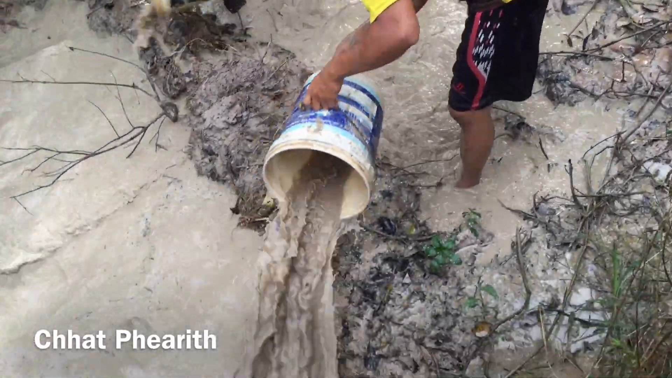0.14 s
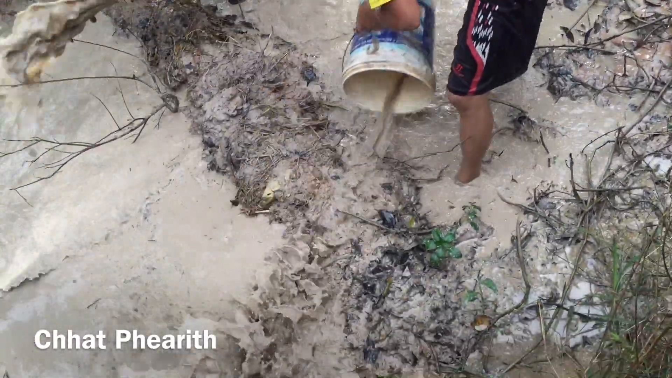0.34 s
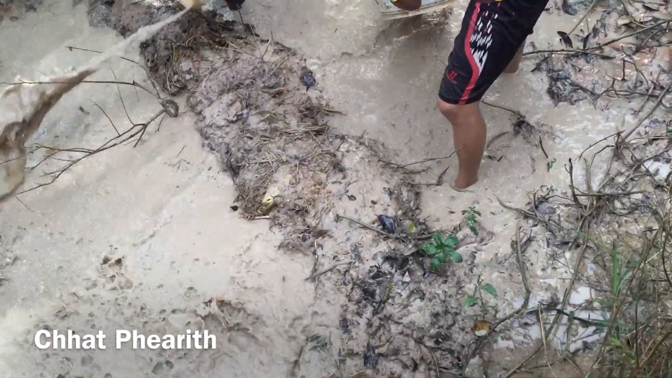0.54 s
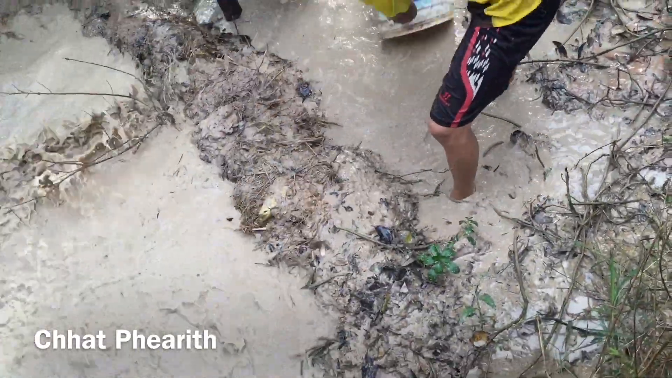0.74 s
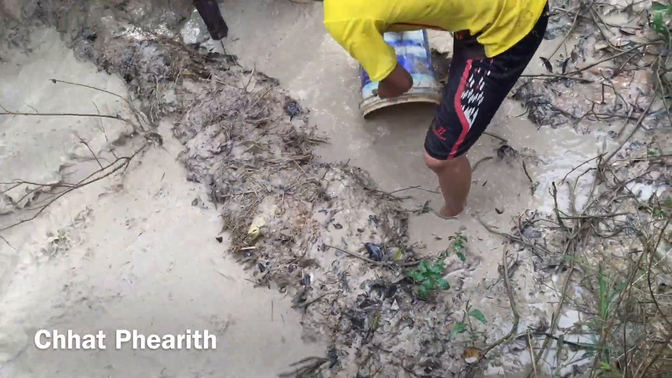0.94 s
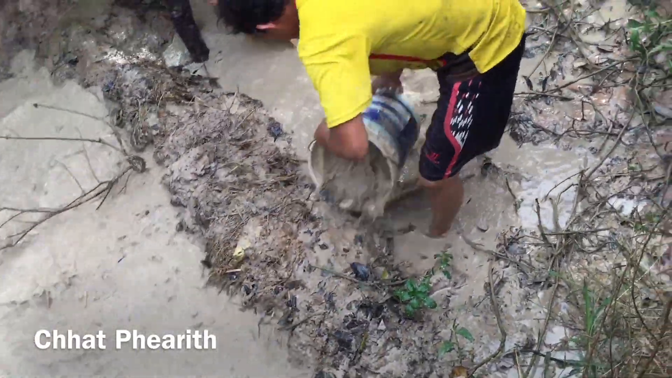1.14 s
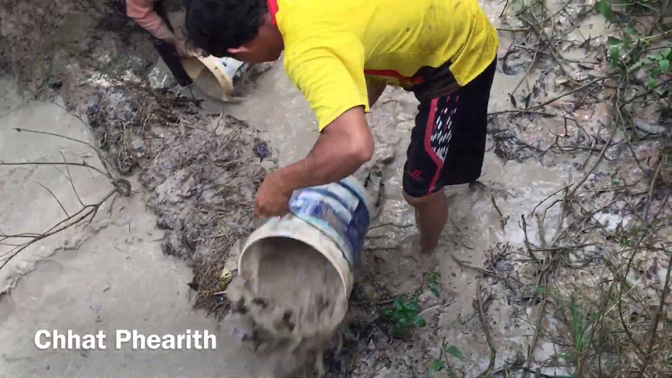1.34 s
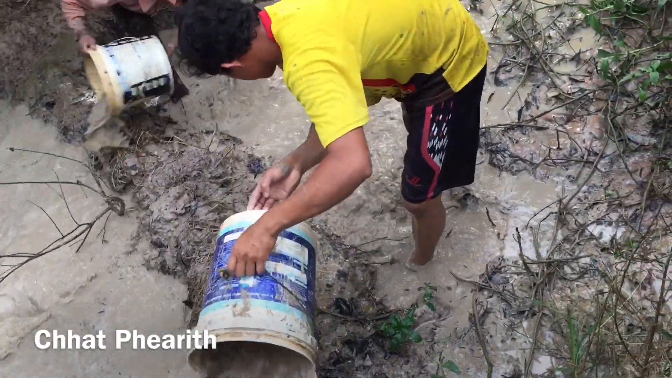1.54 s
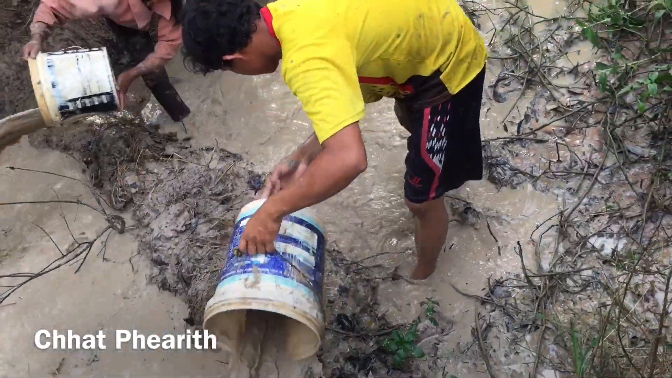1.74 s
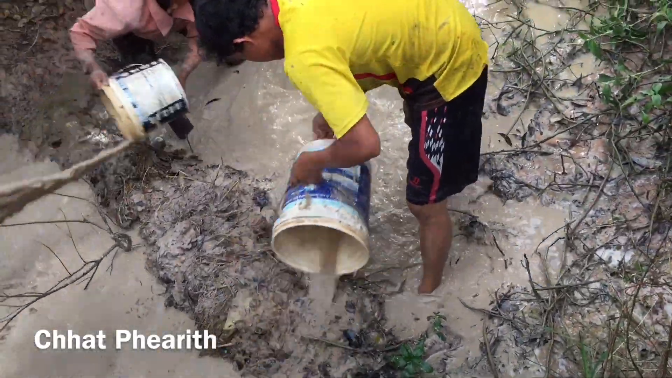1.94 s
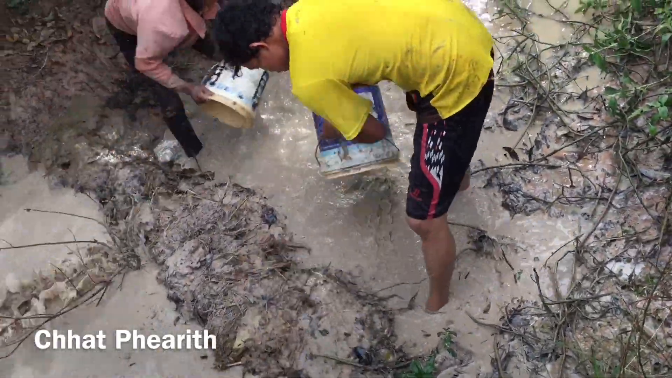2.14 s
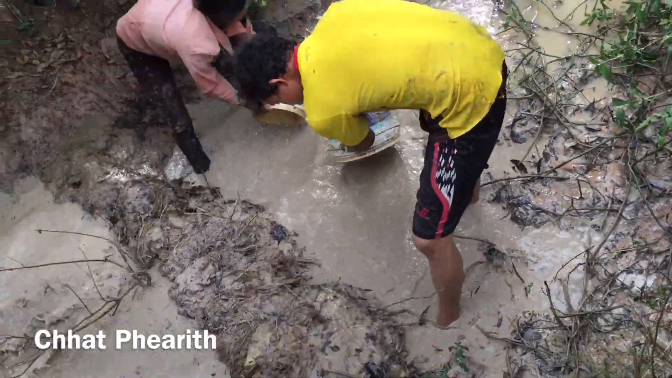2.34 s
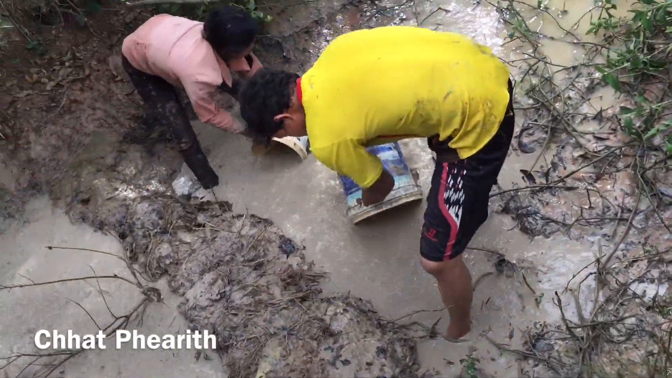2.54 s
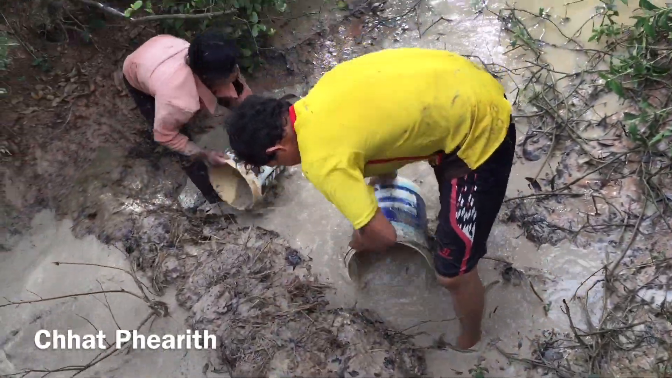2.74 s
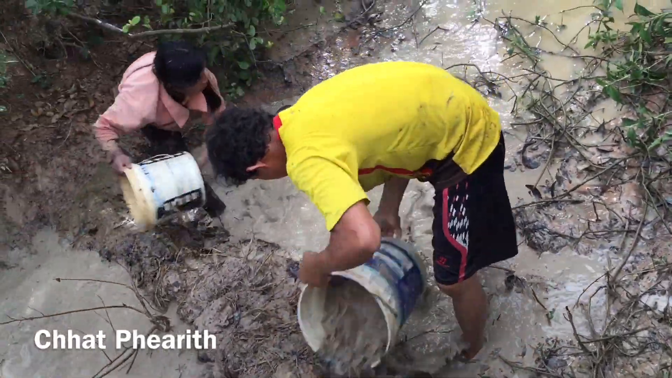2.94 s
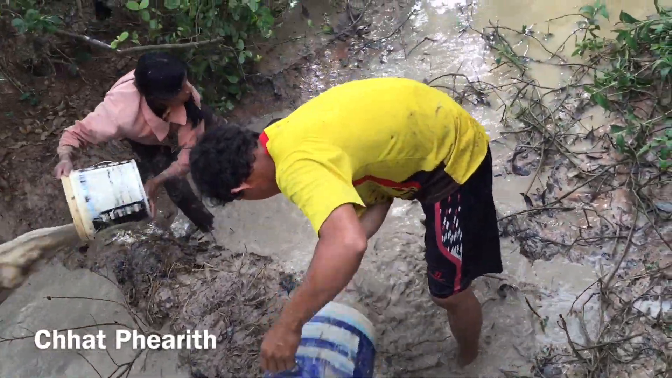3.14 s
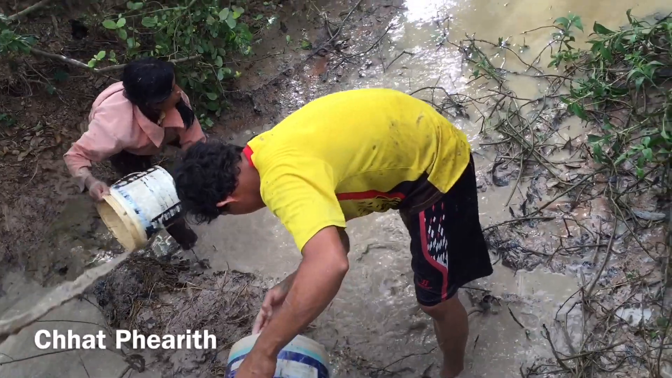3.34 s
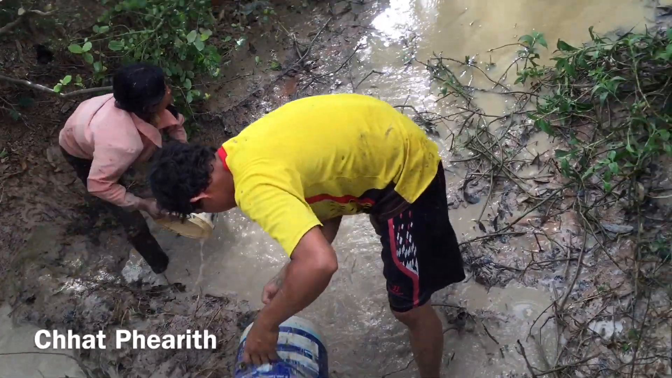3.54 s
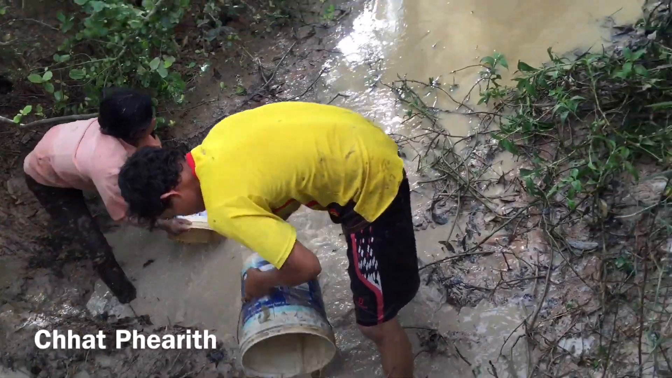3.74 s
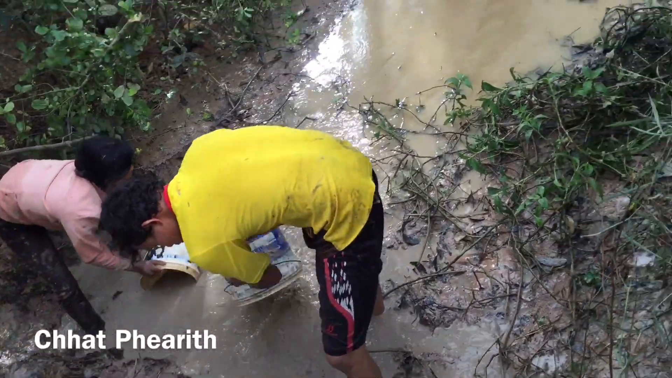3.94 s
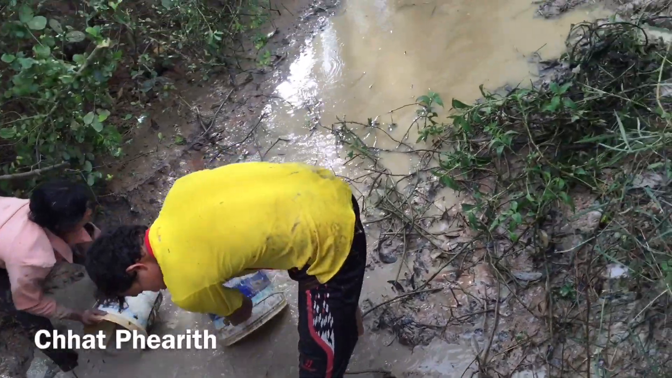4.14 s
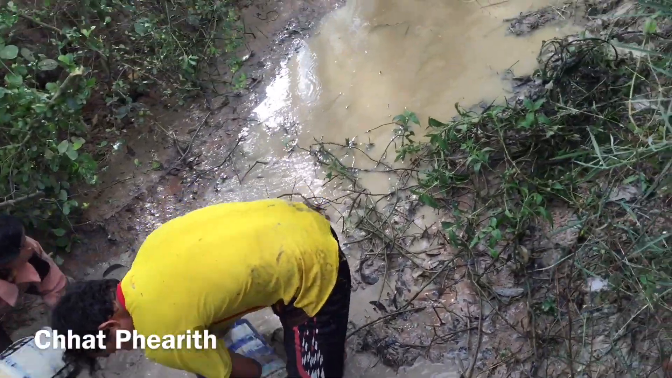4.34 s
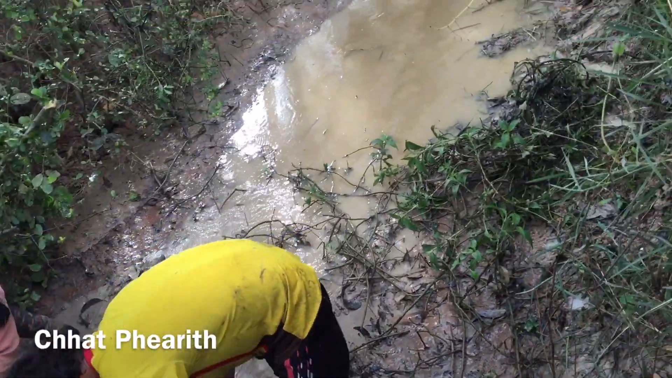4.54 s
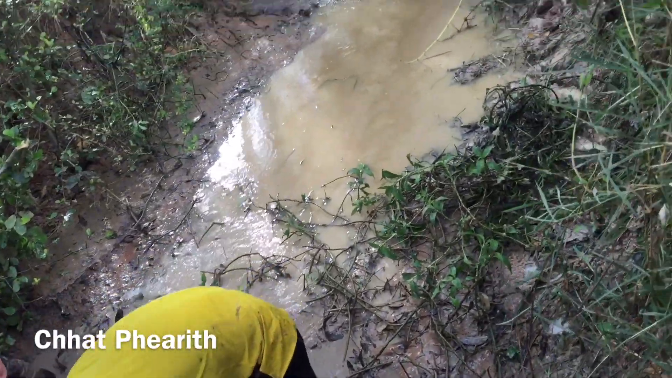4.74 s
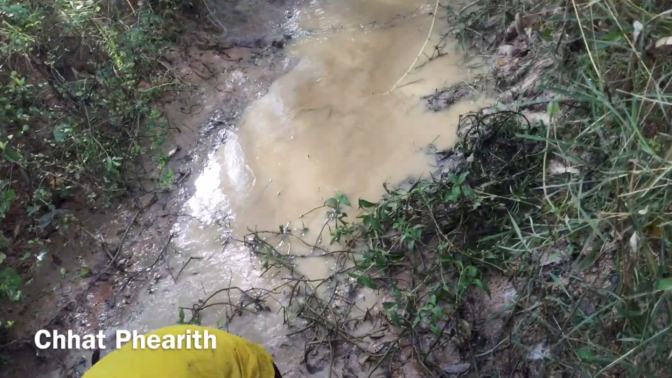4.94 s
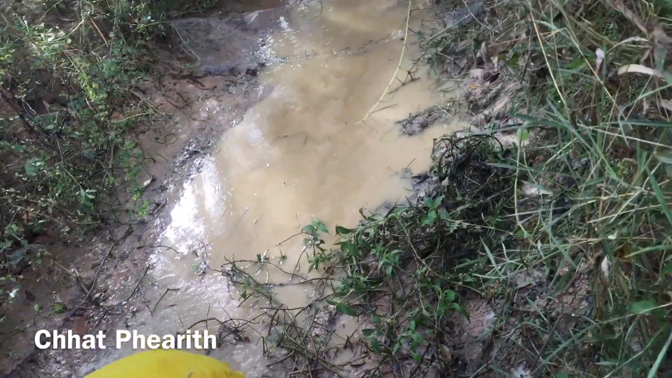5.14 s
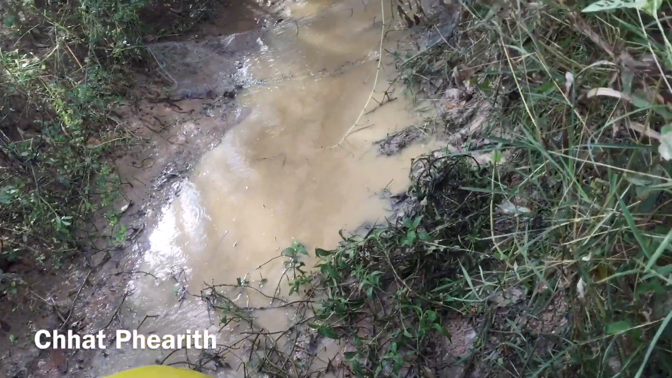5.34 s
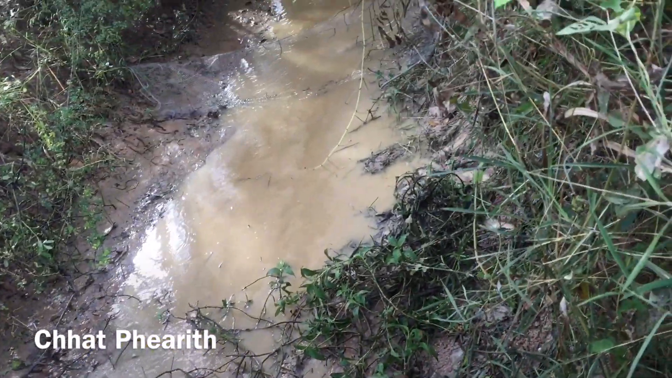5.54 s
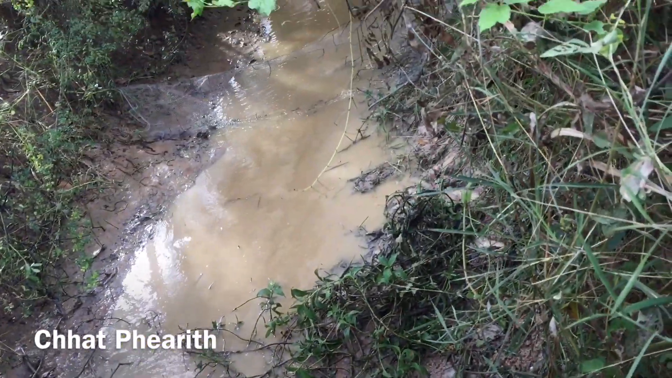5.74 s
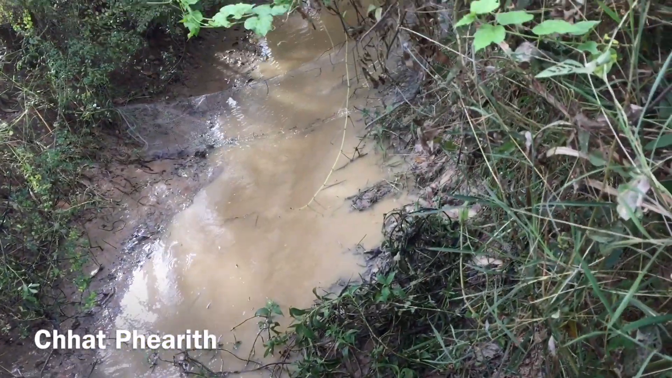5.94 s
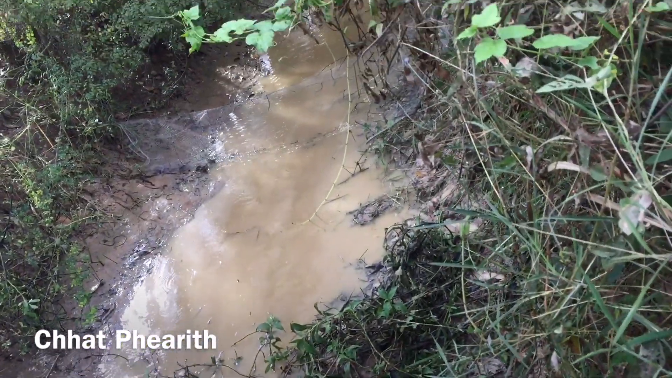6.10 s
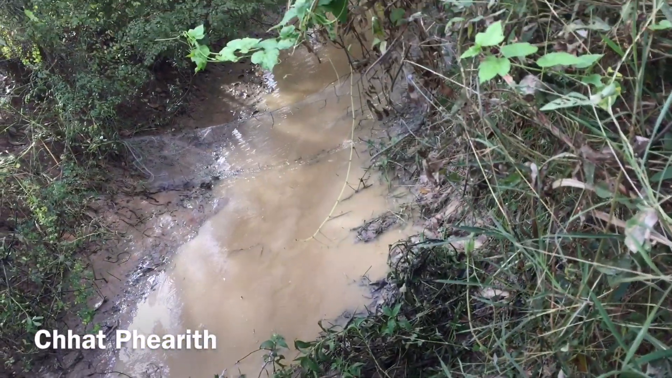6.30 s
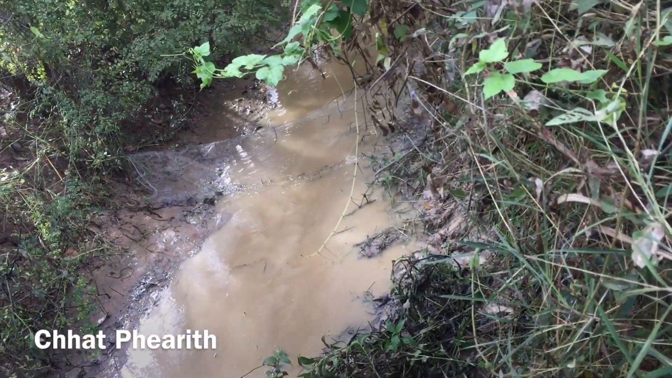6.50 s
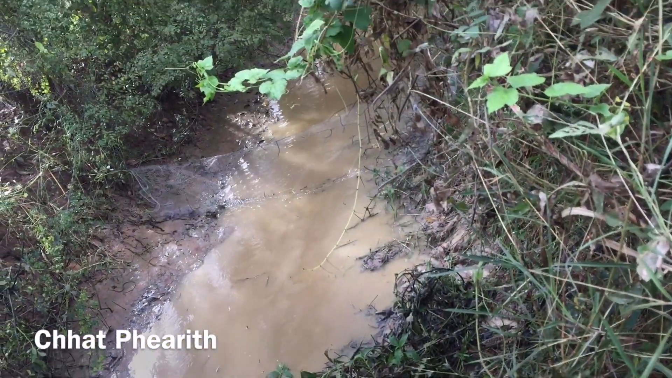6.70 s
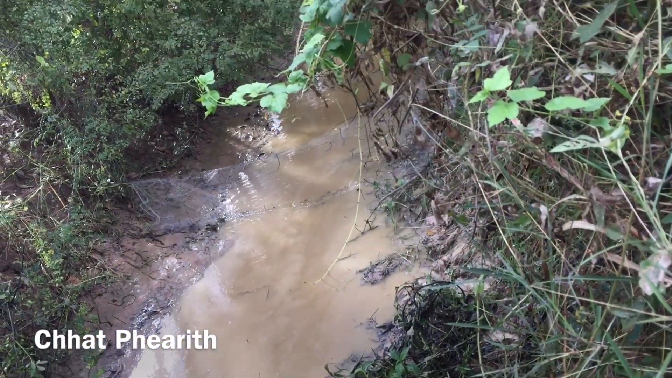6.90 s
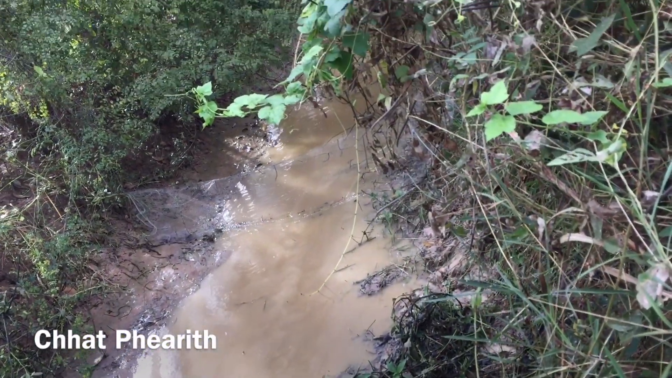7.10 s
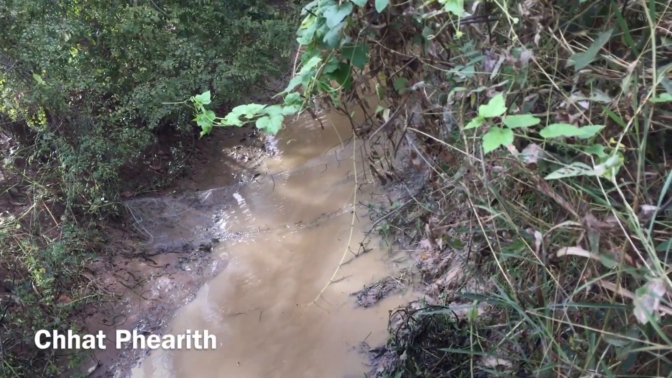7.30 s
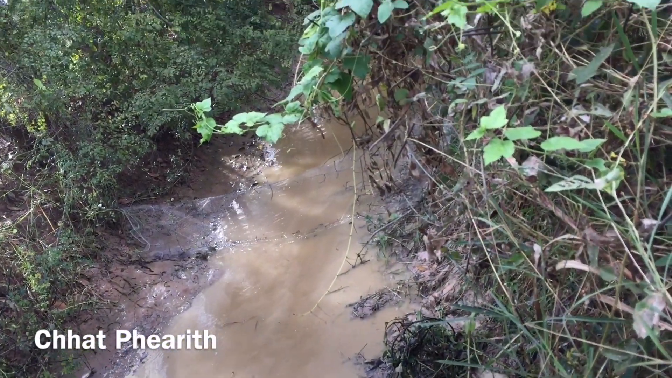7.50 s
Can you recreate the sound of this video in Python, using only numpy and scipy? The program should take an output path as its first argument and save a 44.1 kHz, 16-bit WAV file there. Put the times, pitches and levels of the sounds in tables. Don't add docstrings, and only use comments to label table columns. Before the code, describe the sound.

Close to a phone microphone in an open muddy ditch, bucket loads of water land four times, each a burst of spray, deep glugs, slaps and mud plops. Scooping and trickling fill the gaps. After the last load the pool settles to sparse drips, broken by one sharp wet slap, while a distant pump engine drones low.

```python
import sys
import numpy as np
from scipy import signal
from scipy.fft import rfft, irfft, next_fast_len
from scipy.io import wavfile
from scipy.ndimage import uniform_filter1d, map_coordinates

SR = 44100
rng = np.random.default_rng(int(sys.argv[2]) if len(sys.argv) > 2 else 0)


def invert_db(x):
    u = np.asarray(x, float) / 20
    return 10 ** u


def persist_wave(psi):
    counts = np.round(np.clip(psi, -1, 1) * 32767).astype(np.int16)
    wavfile.write(sys.argv[1], SR, np.atleast_2d(counts).T)


N = 337806

# start of full flow in seconds, rise in seconds,
# length in seconds, spray level in dB, depth (weight of the big bubbles) in dB.
POURS = [
    (0.105, 0.059, 0.3, -28.5, 4.5),
    (1.737, 0.044, 0.14, -27.5, 3.5),
    (3.455, 0.028, 0.35, -28, 4),
    (5.102, 0.052, 0.43, -31, 5),
]
# peak time in seconds, rise in seconds,
# spray level in dB, depth in dB, mist in dB.
SPLASHES = [(0.147, 0.042, -44.5, 27.5, 4.5), (0.719, 0.2, -28, -2.5, -0.5), (1.041, 0.015, -38, 7.5, -1.5),
            (1.558, 0.21, -46, -6, 3), (1.69, 0.078, -27, -16, -1), (1.789, 0.15, -27, 9.5, -7),
            (2.16, 0.099, -35.5, -6, 6.5), (2.69, 0.053, -42, -3, 4.5), (3.01, 0.33, -51.5, -18, 5.5),
            (3.424, 0.029, -39, 2, 8.5), (3.58, 0.17, -31, -4, 3.5), (4.212, 0.12, -44, 0, 0),
            (4.414, 0.038, -48.5, 5.5, 6.5), (4.93, 0.25, -57, 6.5, 1.5), (5.06, 0.058, -27.5, -22, 0),
            (5.17, 0.037, -40, 16, -3), (5.54, 0.66, -40.5, 1.5, 4), (5.116, 0.06, -32, 0, 4),
            (2.96, 0.19, -44.5, -17, -2), (2.529, 0.053, -50.5, -2.5, 6.5), (4.88, .03, -41.5, -14, -3),
            (6.088, 0.089, -59, -3, -2.5), (5.931, 0.024, -36.5, 0.5, -10), (6.421, 0.096, -51.5, -49, -2),
            (6.49, 0.028, -49, -43, 7), (6.552, 0.04, -33.5, -0.5, 1.5), (7.332, 0.059, -45.5, 5.5, -7.5)]
# start of full flow in seconds, length in seconds,
# spray level in dB, depth in dB, mist in dB.
TRICKLES = [(.01, 0.047, -63, -5, 10.5), (0.517, 0.16, -41, -25, 1.5), (0.81, 0.24, -43, 4, 0.5),
            (1.117, 0.2, -40.5, 0, -0.5), (1.385, 0.26, -42.5, 3, -4.5), (2.008, 0.21, -35, -1, 0),
            (2.315, 0.095, -36.5, -3, -3.5), (2.51, 0.22, -54, -11, 4), (2.71, 0.18, -42.5, 4, -3),
            (2.849, 0.24, -40.5, -5, -2), (3.137, 0.19, -50.5, 3.5, -2.5), (3.93, 0.19, -51, -1, 1.5),
            (4.25, 0.085, -49.5, 0.5, -1), (4.487, 0.1, -42, 6, -1.5), (4.627, 0.2, -49, -13, 2),
            (5.73, 0.15, -46, -7.5, -1), (6.017, 0.28, -51, -14, -9.5), (6.613, 0.097, -46.5, 5.5, -3.5),
            (6.76, 0.042, -42.5, -26, -5), (6.86, 0.09, -51, -40, -3.5), (5.983, 0.12, -59, -5, -5),
            (7.062, 0.23, -60, 4, -4.5), (7.37, 0.086, -54.5, -8, -3.5)]
# level in dB re spray, lag in seconds,
# share of the depth (ratio), share of the mist (ratio), speed of fading (ratio).
BUBBLE_SIZES = [(0.5, 0.0045, 0, 1, 0.94), (-7.5, -0.0071, 0, 1.5, 0.86), (-0.5, 0.014, 0.5243, 1.5, 1.29),
                (-6, 0.011, 1.21, 1, 2.06)]
# frequency in Hz, level in dB per Hz.
SPRAY_COLOUR = [(620, -14), (1050, -4), (2200, -1), (2450, -3), (3480, -2.5), (4320, -6), (4990, -11.5),
                (5500, -8.5), (7150, -12), (12100, -120)]
MIST_COLOUR = [(2350, -4), (4000, -2.5), (4870, -6), (5530, -4.5), (6810, -7.5), (9230, -9), (10300, -14),
               (11000, -120)]
GURGLE_COLOUR = [(240, -22), (400, -5.5), (579, -4.5), (716, 0.5), (1040, -6.5), (1300, -22), (1690, -36),
                 (2860, -120)]
CHURN_COLOUR = [(88, -18), (150, -7), (199, -6.5), (264, -4), (318, 1), (500, -1), (650, -36), (1100, -120)]
# time in seconds, peak level in dB, treble in dB re the peak.
SLAPS = [(0.0695, -19.5, 3.5), (0.1247, -15, 0), (0.28, -7.5, -13), (0.454, -13.5, -6), (0.612, -15.5, -2),
         (0.6825, -16, -3), (0.7163, -11, -5.5), (0.959, -14.5, -4.5), (1.04, -18, -5.5),
         (1.553, -23.5, -1), (1.639, -14, -4.5), (1.657, -26, 2.5), (1.681, -30, -5), (2.1517, -28, 1),
         (2.603, -22.5, -4), (3.314, -28.5, -6), (3.39, -30.5, 3), (3.408, -36.5, -2), (3.479, -13.5, -0.5),
         (3.57, -11.5, -10.5), (4.298, -24.5, -23), (4.422, -28, -5), (4.453, -34, 11.5), (4.5385, -19, -7),
         (4.9887, -37.5, 9.5), (5.046, -22.5, 1), (5.0658, -12, -4), (6.406, -43, 3.5), (6.527, -18.5, 0.5),
         (6.536, -7.5, -9.5)]
# time in seconds, peak level in dB.
LUMPS = [(0.325, -36), (1.007, -13.5), (5.846, -27.5), (1.4526, -30.5), (1.7514, -7.5), (1.8467, -10.5),
         (2.121, -9.5), (2.686, -24.5), (3.002, -18.5), (3.24, -28), (4.202, -34), (4.71, -41),
         (5.164, -10.5), (5.2995, -12.5), (6.545, -19), (1.215, -21.5), (1.284, -21), (1.33, -24),
         (5.9237, -35), (5.23, -16), (6.484, -17.5), (6.592, -12.5), (6.77, -26.5), (6.987, -25.5),
         (7.082, -35.5), (7.127, -36.5), (7.361, -37), (7.4, -34), (7.451, -37)]
# time in seconds, peak level in dB, pitch in Hz.
TICKS = [(0.0468, -26, 3330), (0.0727, -31, 3400), (0.1241, -13.5, 3730), (0.3242, -25.5, 2090),
         (0.9592, -29, 2300), (1.01, -22, 2450), (1.0415, -40, 2040), (1.3823, -29, 2210),
         (1.4163, -32, 2080), (1.455, -23.5, 3480), (1.5534, -33, 2320), (1.638, -24.5, 3600),
         (1.682, -26, 2320), (1.8467, -17, 2780), (2.1201, -17.5, 3020), (2.6045, -34, 2190),
         (2.6798, -17.5, 2700), (2.806, -41, 2220), (3.0046, -22.5, 2270), (3.2440, -30, 2270),
         (3.3116, -34, 3800), (3.3723, -43, 3200), (3.3922, -21, 3940), (3.41, -22.5, 3040),
         (3.5668, -12.5, 2700), (3.9539, -33, 2640), (4.0203, -37, 2070), (4.261, -31, 3380),
         (4.403, -38, 2650), (4.4553, -29, 3800), (4.5411, -25, 2020), (4.7117, -26, 2970),
         (4.9167, -38, 2030), (2.509, -31, 3100), (5.004, -22.5, 4040), (5.2999, -24.5, 2180),
         (5.94, -32, 2300), (6.076, -44, 2060), (5.0147, -28, 3900), (6.155, -41.5, 2160),
         (6.3954, -35, 2850), (6.4078, -29, 2870), (6.472, -38, 3310), (6.485, -18.5, 3070),
         (6.5264, -26.5, 2530), (6.542, -12.5, 2930), (6.5927, -29, 2100), (6.98, -35, 4160),
         (2.68, -22.5, 3450), (2.677, -25, 4100), (1.465, -30, 4400), (1.482, -24, 5130),
         (1.655, -13.5, 4200), (1.011, -26, 3500), (6.406, -30, 4230), (6.485, -23.5, 2160),
         (7.1282, -39.5, 2840), (4.223, -30, 2710), (4.469, -27, 3700), (3.224, -33, 3270),
         (2.982, -27, 3100), (5.848, -32, 4300), (6.09, -38, 3700), (7.3203, -49, 1970), (7.449, -35, 2800)]
# time in seconds, peak level in dB, pitch in Hz.
GLUGS = [(0.1, -22, 335), (0.147, -23.5, 312), (0.169, -33, 189), (0.714, -32, 373), (0.966, -38, 195),
         (1.012, -44, 203), (1.753, -19.5, 294), (1.778, -26, 287), (1.85, -34, 244), (1.805, -32, 198),
         (2.128, -32, 354), (2.214, -33.5, 420), (2.27, -34.5, 347), (0.417, -39, 405), (7.35, -46, 410),
         (2.677, -30.5, 302), (2.7, -35, 212), (2.728, -44, 212), (3.479, -23, 320), (3.571, -28, 386),
         (4.056, -43.5, 286), (4.427, -34.5, 200), (4.503, -32, 270), (4.566, -41, 405), (4.455, -44, 232),
         (4.53, -42, 325), (4.59, -50, 324), (2.755, -50, 256), (4.885, -42.5, 413), (5.105, -40, 382),
         (5.164, -30, 298), (6.533, -36.5, 362), (6.897, -50, 268), (7.328, -41, 347), (7.382, -40.5, 340)]
# time in seconds, peak level in dB,
# pitch in Hz.
PLOPS = [(0.103, -21.5, 630), (0.15, -8, 626), (0.2, -16, 813), (0.282, -18.5, 633), (0.716, -16, 836),
         (0.921, -27.5, 517), (1.046, -24, 790), (1.036, -27, 1080), (1.281, -29, 504), (1.741, -19, 540),
         (1.788, -14.5, 500), (1.836, -15, 684), (1.872, -16.5, 674), (1.967, -24.5, 720),
         (2.119, -24, 800), (2.161, -16, 870), (2.605, -28.5, 585), (2.676, -25, 606), (2.722, -28.5, 750),
         (3.42, -25, 613), (3.478, -7.5, 774), (3.571, -9.5, 640), (4.198, -21, 860), (4.506, -35, 680),
         (4.566, -44, 720), (5.104, -22, 860), (5.157, -12, 588), (0.138, -20, 462), (0.58, -30.5, 634),
         (0.673, -36, 880), (0.701, -23, 888), (0.802, -32, 550), (0.898, -33, 660), (1.058, -27, 710),
         (1.315, -35, 704), (1.705, -28, 650), (1.927, -22, 820), (2.048, -24, 705), (2.969, -34, 770),
         (3.499, -12.5, 718), (3.638, -26, 690), (3.726, -25, 610), (3.812, -31, 570), (4.431, -27, 715),
         (4.445, -24, 770), (4.457, -30.5, 760), (4.541, -26, 1120), (5.075, -22, 557), (5.267, -31, 586),
         (5.362, -22, 774), (6.657, -33, 448), (0.228, -19, 680), (2.807, -28, 635), (5.183, -15, 1500),
         (5.443, -20, 545), (5.6, -27, 750), (5.114, -15.5, 1370), (4.68, -37, 670), (6.361, -38, 580),
         (6.584, -21, 845),
         (0.324, -19, 2050), (0.541, -22, 1920), (0.959, -29, 1400), (1.007, -17.5, 1600),
        (1.414, -27, 2170), (1.635, -24, 1970), (2.807, -25.5, 1920), (2.888, -28, 1630), (3.07, -27, 1750),
        (3.245, -34, 1040), (4.186, -30, 1000), (4.205, -24.5, 1230), (3.087, -33, 1730),
        (4.416, -23.5, 1280), (4.931, -27, 1590), (5.065, -42, 1240), (5.925, -28, 1500),
        (6.488, -24, 1240), (6.533, -22, 1540), (6.771, -32, 1090), (7.308, -36, 1480), (7.32, -29, 1630),
        (7.484, -34, 1510), (6.493, -29, 1400), (7.329, -34, 1800), (7.35, -37, 1910), (7.362, -37, 1600),
        (7.35, -37, 825), (7.406, -41, 1520), (7.237, -44, 730), (7.293, -39, 1190), (7.486, -43, 900),
        (7.443, -48, 850), (3.449, -16.5, 1800), (3.505, -17, 2060), (6.61, -29, 830)]
# time in seconds, peak level in dB, pitch in Hz.
DRIPS = [(3.109, -45, 785), (3.143, -46, 565), (3.224, -45, 570), (3.312, -40, 720), (3.345, -40, 844),
         (4.881, -43, 710), (5.679, -41, 950), (5.845, -49, 1870), (5.869, -48, 1050), (5.934, -39, 2400),
         (6.094, -50, 746), (6.114, -43, 2320), (6.186, -49, 1060), (6.434, -45, 2070), (6.835, -39, 2880),
         (6.859, -45, 1570), (6.925, -48, 2550), (6.985, -40, 847), (7.074, -47, 875), (7.1, -45, 1680),
         (7.134, -48, 1250), (7.274, -48, 1280), (7.334, -46, 855), (7.389, -48, 1550), (5.755, -38, 1930),
         (5.785, -35, 3230), (5.82, -48, 1480), (5.995, -50, 690), (6.05, -58, 980), (6.305, -47.5, 2000),
         (6.731, -51, 1970), (6.885, -48, 2950), (6.957, -56, 2230), (7.164, -51, 460), (7.504, -46, 950)]
# time in seconds, peak level in dB, pitch in Hz.
THUMPS = [
    (0.17, -28, 173),
    (1.75, -29.5, 170),
    (2.727, -36, 187),
    (3.58, -39, 110),
    (4.403, -36.5, 202),
    (4.413, -29, 160),
    (5.198, -47, 167),
    (5.28, -38, 165),
]
# time in seconds, peak level in dB, pitch in Hz.
SCOOP = [
    (0.984, -16.5, 200.6),
]
# time in seconds, peak level in dB, pitch in Hz,
# 60 dB decay in seconds.
DRAIN = [
    (7.462, -56.5, 340, 0.41),
]
# delay in seconds, level in dB.
BANKS = [(.003, -30), (.007, -20), (.012, -18)]
# frequency in Hz, width in Hz, level in dB re the drone.
PUMP = [(69.6, 8.2, -4.5), (138, 7.6, -8.5), (106, 5.3, -24)]
# time in seconds, level in dB.
DRONE = [(0.0, -60), (1.09, -58), (1.77, -67), (2.11, -70), (2.54, -55), (2.73, -57.5), (3.09, -59.5),
         (4.46, -57.5), (4.82, -60.5), (5.12, -52), (5.52, -61), (5.75, -62.5), (6.0, -57), (6.22, -60.5),
         (6.42, -57.5), (7.03, -57), (7.2, -61), (7.66, -58)]
# frequency in Hz, level in dB per Hz.
RUMBLE_COLOUR = [(13, -44.5), (22, -21), (59, 2), (92, -2), (140, -3), (153, -11), (162, -12.5),
                 (260, -31.5), (340, -67), (570, -120)]
AIR_COLOUR = [(120, -44), (200, -1.5), (684, -17.5), (754, -2.5), (1600, -10.5), (1950, -11.5),
              (2710, -11.5), (9110, -21.5), (10300, -22), (11000, -120)]
# frequency in Hz, level in dB re the top band.
WEAK_TREBLE = [(6800, -30), (7800, -9), (9000, -6.5), (9700, -3)]

POUR_FADE, SPLASH_FADE, TRICKLE_FADE = (22.9, 82), (150, 240), (7.8, 160)
TRICKLE_RISE_S, RISE_DB = 0.17, 23
LUMP_TREBLE_DB = -11.5
TOP_HZ, ABOVE_TOP_DB = 9640, -42


def unit(x):
    return x / np.sqrt(np.mean(x ** 2) + 1e-20)


def along(points, hz):
    f, v = np.transpose(points)
    return np.interp(np.log(hz + 1), np.log(f + 1), v)


def wobble(rate):
    return map_coordinates(rng.standard_normal(N // 100), [np.arange(N) * rate / SR])


def filtered(x, response):
    m = next_fast_len(N + 8192)
    return irfft(rfft(x, m) * response(np.fft.rfftfreq(m, 1 / SR)), m)[:N]


def coloured(x, spectrum):
    return unit(filtered(x, lambda hz: invert_db(along(spectrum, hz))))


def patchy(patchy_db):
    z = signal.stft(rng.standard_normal(N + 256), nperseg=256)[2]
    field = uniform_filter1d(rng.standard_normal(z.shape), size=4, axis=0)
    field = uniform_filter1d(field, size=5, axis=1)
    return unit(signal.istft(z * invert_db(patchy_db * unit(field)), nperseg=256)[1][:N])


def summed(start_s, shapes):
    at = np.round(start_s * SR).astype(int)[:, None] + np.arange(shapes.shape[1])
    return np.bincount(at.ravel(), shapes.ravel(), N + shapes.shape[1] + SR)[:N]


def at_peaks(s, peak_db, shapes):
    return summed(s, shapes * (invert_db(peak_db) / np.abs(shapes).max(axis=1))[:, None])


def ringing(hz, t60, onset, rise, size):
    t = np.arange(size) / SR
    hz, t60, onset, rise = (np.reshape(v, (-1, 1)) for v in (hz, t60, onset, rise))
    turns = hz * (t + rise * t * np.minimum(t / t60, 1) / 2)
    return np.sin(2 * np.pi * turns) * invert_db(-60 * t / t60) * (1 - np.exp(-t / onset)) ** 2


def swarm(count, size, mid_hz, octaves, cycles, spread_db, rise):
    draw = rng.standard_normal((count, 2))
    when = rng.random(count)
    loud = np.minimum(rng.exponential(size=count), 3)
    hz = np.clip(mid_hz * 2 ** (octaves * draw[:, 0]), 100, SR / 4)
    t60 = np.minimum(cycles * np.exp(.3 * draw[:, 1]) / hz, size / SR)
    tones = ringing(hz, t60, t60 / 16, rise, size) * invert_db(spread_db * loud)[:, None]
    return unit(summed(when * N / SR, tones))


def flows():
    rows = [(s, rise, length, db, depth, 0, *POUR_FADE) for s, rise, length, db, depth in POURS]
    rows += [(s, rise, 0, db, depth, mist, *SPLASH_FADE) for s, rise, db, depth, mist in SPLASHES]
    rows += [(s, TRICKLE_RISE_S, length, db, depth, mist, *TRICKLE_FADE)
             for s, length, db, depth, mist in TRICKLES]
    s, rise, length, db, depth, mist, sag, stop = (c[:, None] for c in np.transpose(rows))
    clock = np.arange(0, N + 200, 100) / SR
    levels = []
    for own_db, lag, deep, misty, speed in BUBBLE_SIZES:
        t = clock - s - lag
        fall = speed * (sag * np.clip(t, 0, length) + stop * np.maximum(t - length, 0))
        fall = fall + RISE_DB * np.maximum(-t / rise, 0)
        power = (invert_db(db + own_db + deep * depth + misty * mist - fall) ** 2).sum(axis=0)
        levels.append(np.interp(np.arange(N) / SR, clock, 10 * np.log10(power + 1e-12)))
    return levels


def thrown_water():
    spray_db, mist_db, gurgle_db, churn_db = flows()
    breakup_db = .4 * wobble(14) + .6 * wobble(45) + 1.3 * wobble(150)
    breakup_db = breakup_db * np.clip((-18 - spray_db) / 24, .7, 1.1)
    thin = np.clip((-36 - spray_db) / 18, 0, 1)

    spray = swarm(count=7000, size=600, mid_hz=2300, octaves=.8, cycles=40, spread_db=2.2, rise=.06)
    spray = patchy(1.3) + (.32 + .45 * thin) * spray
    mist = swarm(count=3000, size=600, mid_hz=6500, octaves=.45, cycles=90, spread_db=3, rise=.04)
    spits = swarm(count=900, size=150, mid_hz=6500, octaves=.5, cycles=7, spread_db=4, rise=0)
    mist = patchy(1.3) + .28 * mist + .3 * spits
    gurgle = swarm(count=3000, size=1300, mid_hz=720, octaves=.55, cycles=20, spread_db=2.6, rise=.15)
    gurgle = patchy(1.3) + (.36 + .35 * thin) * gurgle
    churn = swarm(count=1100, size=2400, mid_hz=290, octaves=.55, cycles=12, spread_db=2.2, rise=.15)
    churn = patchy(1.3) + .36 * churn

    fine = invert_db(spray_db) * coloured(spray, SPRAY_COLOUR) + invert_db(mist_db + 2.0) * coloured(mist, MIST_COLOUR)
    coarse = invert_db(gurgle_db - 2.5) * coloured(gurgle, GURGLE_COLOUR)
    coarse = coarse + invert_db(churn_db - 2.5) * coloured(churn, CHURN_COLOUR)
    return invert_db(-2.5) * unit(invert_db(breakup_db)) * (fine + coarse)


def slaps():
    hits = SLAPS + [(*lump, LUMP_TREBLE_DB) for lump in LUMPS]
    s, db, treble_db = np.transpose(hits)
    s = s - .002
    t = np.arange(2000) / SR
    attack = (1 - np.exp(-t / .003)) ** 2
    fade = invert_db(db[:, None] - 13.5 - 60 * t / 0.056) * attack
    cluster = swarm(count=8000, size=350, mid_hz=2300, octaves=.8, cycles=22, spread_db=2, rise=.2)
    cluster = patchy(2) + .8 * cluster
    body = summed(s, fade) * coloured(cluster, SPRAY_COLOUR)
    treble = summed(s, fade * invert_db(treble_db + 3.5)[:, None]) * coloured(patchy(3.0), MIST_COLOUR)
    return body + treble


def ticks():
    s, db, hz = np.transpose(TICKS)
    t = np.arange(900) / SR
    crack = signal.lfilter([1, 1, -1, -1], [1], rng.standard_normal((len(s), len(t))), axis=1)
    crack = crack * invert_db(-60 * t / .014) * (1 - np.exp(-t / .0014))
    shapes = ringing(hz, .002 + 14 / hz, .0004, .1, size=900) + .14 * crack
    return filtered(at_peaks(s, db - 5, shapes), lambda f: 1 / (1 + (f / 5500) ** 4))


def air_pockets(table, gain_db, settle_s, cycles, onset_cycles, rise):
    s, db, hz, *own = np.transpose(table)
    t60 = np.clip(settle_s + cycles / hz + sum(own), .01, .4)
    return at_peaks(s, db + gain_db, ringing(hz, t60, onset_cycles / hz, rise, size=6500))


def bubbles():
    glugs = air_pockets(GLUGS, gain_db=0.5, settle_s=0.0098, cycles=13.0, onset_cycles=1.4, rise=0.019)
    plops = air_pockets(PLOPS, gain_db=-9.0, settle_s=0.018, cycles=7.1, onset_cycles=0.43, rise=0.11)
    drips = air_pockets(DRIPS, gain_db=-5, settle_s=0.012, cycles=34, onset_cycles=2, rise=0.12)
    thumps = air_pockets(THUMPS, gain_db=4.0, settle_s=0.0037, cycles=4.4, onset_cycles=0.3, rise=0.052)
    drain = air_pockets(DRAIN, gain_db=-5.5, settle_s=0, cycles=0, onset_cycles=9.2, rise=-0.23)
    scoop = air_pockets(SCOOP, gain_db=0, settle_s=0, cycles=12, onset_cycles=4, rise=0.01)
    wallow = unit(invert_db(3 * wobble(130)))
    patter = unit(invert_db(4.8 * wobble(200)))
    return drain + scoop + wallow * (glugs + thumps) + plops + patter * drips


def engine_order(hz, width_hz):
    return unit(filtered(rng.standard_normal(N), lambda f: 1 / (1 + ((f - hz) / width_hz * 2) ** 2)))


def background():
    orders = sum(invert_db(db) * engine_order(hz, width_hz) for hz, width_hz, db in PUMP)
    rumble = invert_db(-3.5 + 1.3 * wobble(14.0)) * coloured(rng.standard_normal(N), RUMBLE_COLOUR)
    drone_db = np.interp(np.arange(N) / SR, *np.transpose(DRONE))
    air = invert_db(-70.5) * coloured(patchy(2.5), AIR_COLOUR)
    return invert_db(drone_db + 2.0) * (orders + rumble) + air


def scene():
    near = bubbles() + slaps() + ticks()
    echoes = sum(invert_db(db) * np.pad(near, (round(s * SR), 0))[:N] for s, db in BANKS)
    return (near + echoes + thrown_water() + background())[None]


def treble_dropouts(x):
    hz, _, z = signal.stft(x, SR, nperseg=1024, noverlap=512)

    def band(lo, hi):
        return np.abs(z[(hz > lo) & (hz < hi)]).mean(axis=0) + 1e-9

    middle = band(500, 4000)
    loud_db = 20 * np.log10(middle / np.median(middle))
    threshold_db = 7 * uniform_filter1d(rng.standard_normal(len(loud_db)), size=3)
    threshold_db = threshold_db - .5 * np.maximum(loud_db, 0) - 2 * np.maximum(-14 - loud_db, 0)
    threshold = band(8000, 9600) * invert_db(along(WEAK_TREBLE, hz)[:, None] + threshold_db)
    kept = uniform_filter1d(np.abs(z), size=3, axis=0) > threshold
    below = (hz < WEAK_TREBLE[0][0])[:, None]
    return signal.istft(z * (kept | below), SR, nperseg=1024, noverlap=512)[1][:N]


def roll_off(x):
    return signal.sosfilt(signal.butter(12, 10200, fs=SR, output="sos"), x)


def record(dry):
    rounded = dry[0] / (1 + np.abs(dry[0] / .4) ** 4) ** (1 / 4)

    def response(hz):
        bass_cut = hz ** 3 / (hz ** 3 + 35 ** 3)
        return np.where(hz < TOP_HZ, 1, invert_db(ABOVE_TOP_DB)) * bass_cut

    heard = filtered(treble_dropouts(rounded), response)
    return roll_off(heard[None])


dry = scene()
out = record(dry)
persist_wave(out)
```